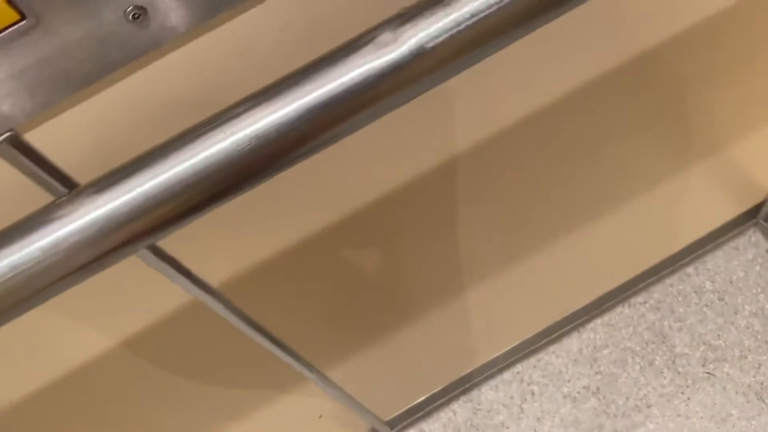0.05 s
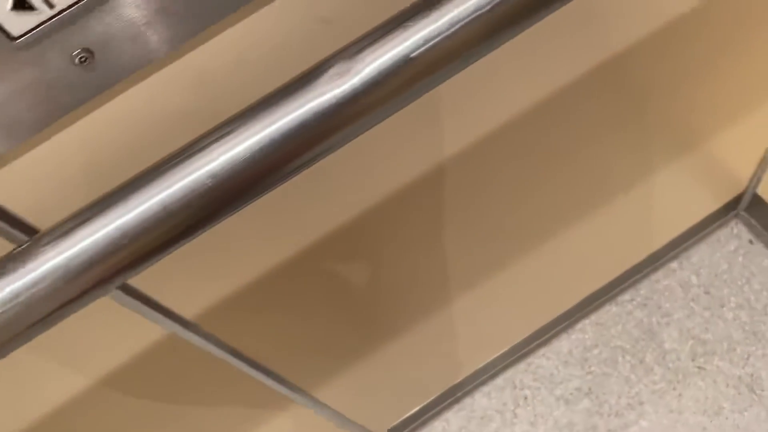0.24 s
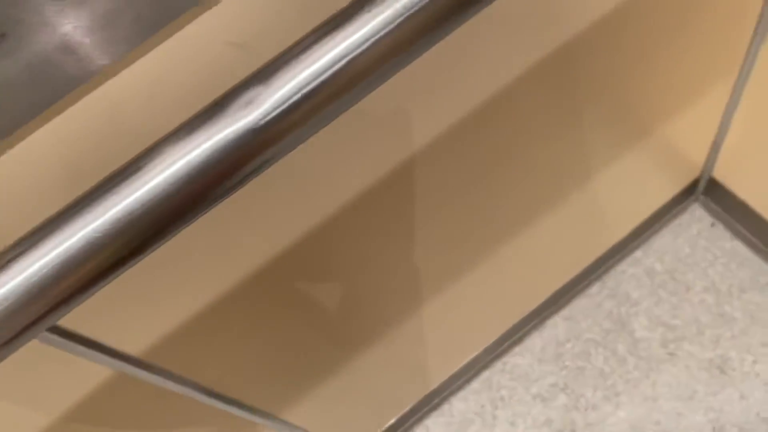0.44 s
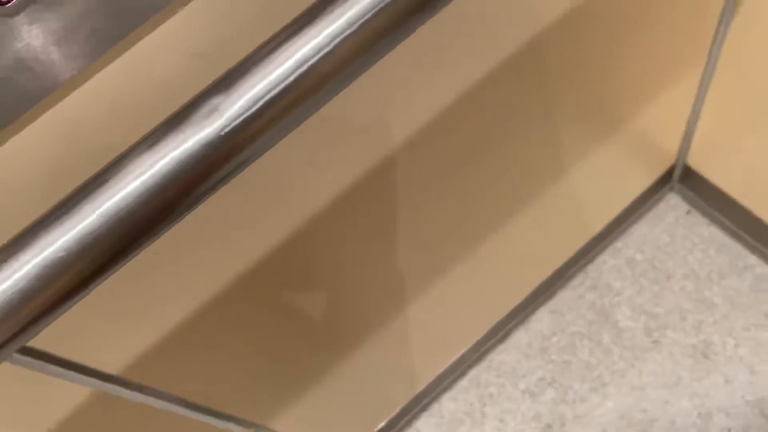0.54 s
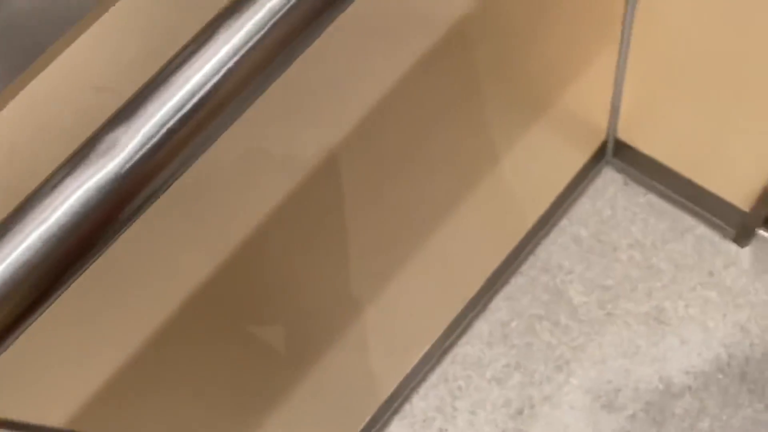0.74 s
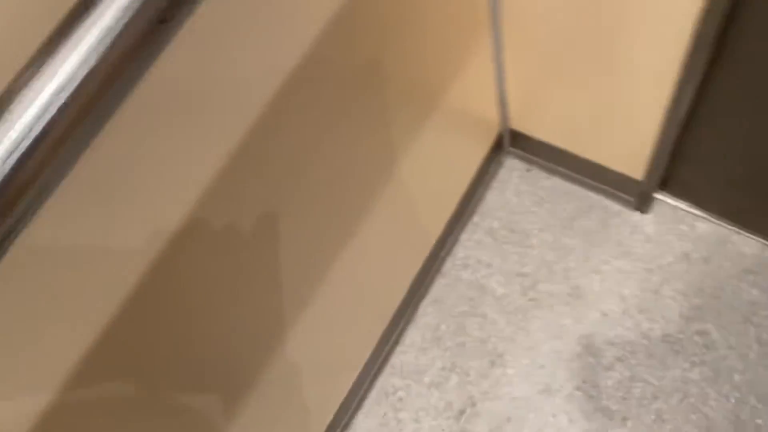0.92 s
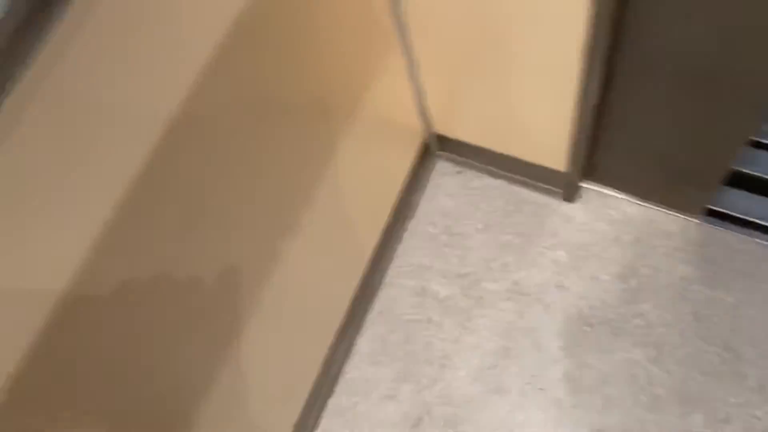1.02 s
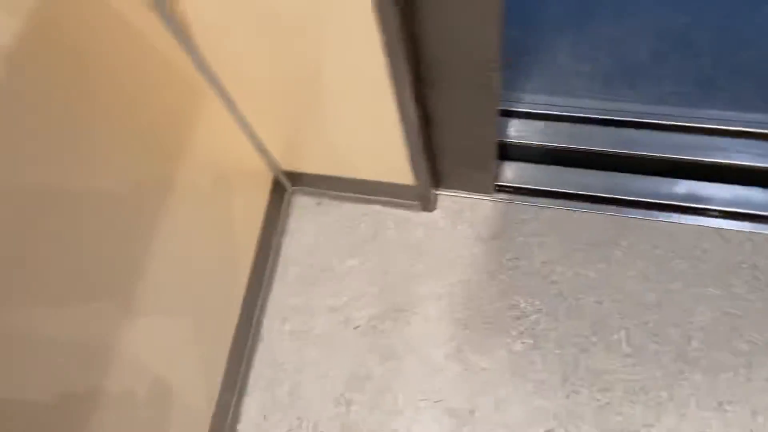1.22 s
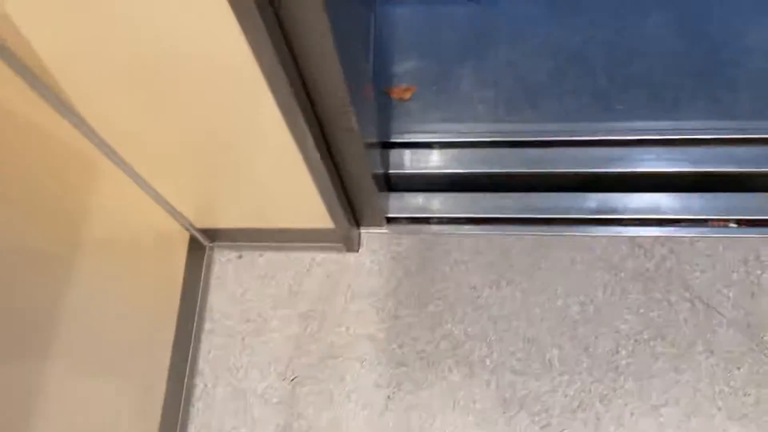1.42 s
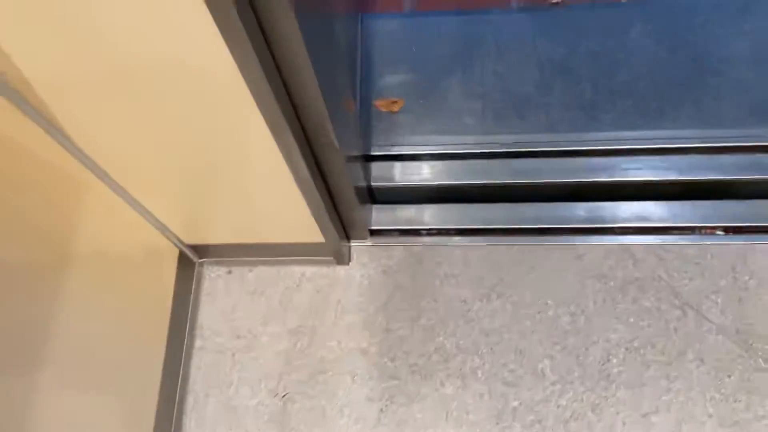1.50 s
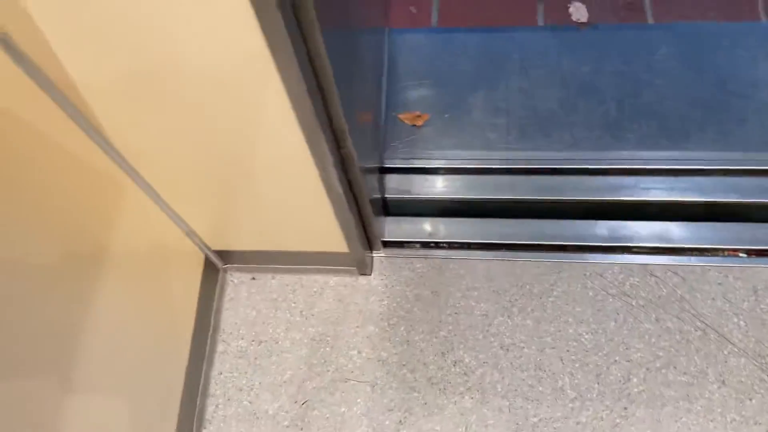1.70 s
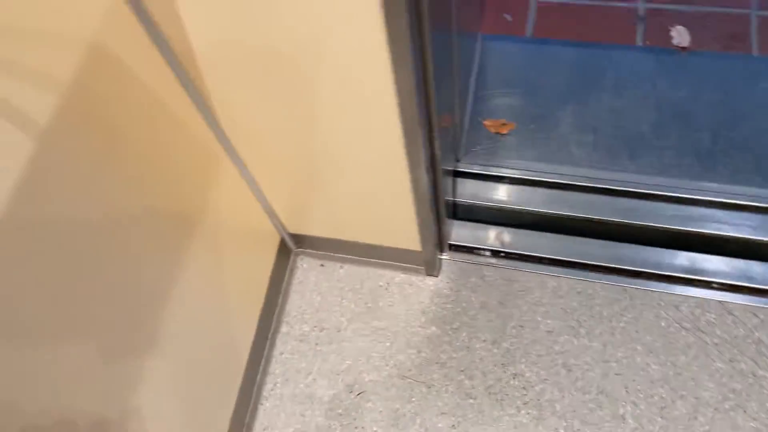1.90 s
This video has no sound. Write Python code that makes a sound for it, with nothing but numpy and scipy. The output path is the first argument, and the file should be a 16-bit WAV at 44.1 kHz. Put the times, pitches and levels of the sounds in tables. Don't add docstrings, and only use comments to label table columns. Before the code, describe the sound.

A sliding lift door rumbles open with a low hum, squeaky rollers and a closing metallic click

```python
import sys
import numpy as np
from scipy import signal
from scipy.fft import rfft, irfft, next_fast_len
from scipy.io import wavfile

SR = 44100
rng = np.random.default_rng(int(sys.argv[2]) if len(sys.argv) > 2 else 0)


def master_out(mix):
    frames = np.transpose(np.atleast_2d(mix))
    ceiling = np.clip(frames, -1, 1)
    pcm = np.round(ceiling * 32767).astype(np.int16)
    wavfile.write(sys.argv[1], SR, pcm)


def makeup_ratio(level_db):
    decades = np.asarray(level_db, float) / 20
    return 10 ** decades


N = 85995


def unit_rms(x):
    return x / np.sqrt(np.mean(x ** 2) + 1e-20)


def in_time(rows):
    s, *columns = np.transpose(rows)
    return [np.interp(np.arange(N) / SR, s, c) for c in columns]


def at_hz(points, hz):
    point_hz, point_db = np.array(points).T
    return np.interp(np.log(hz), np.log(point_hz), point_db)


def drift(rate_hz):
    r = np.exp(-80 * np.pi * rate_hz / SR)
    white = rng.standard_normal(N // 40 + 2002)
    slow = signal.lfilter([1], [1, -2 * r, r * r], white)[2000:]
    return np.interp(np.arange(N) / 40, np.arange(len(slow)), unit_rms(slow - slow.mean()))


def stereo(mid, side):
    return np.array([mid + side, mid - side])


def coloured(gain_at, count=2):
    size = next_fast_len(N)
    hz = np.maximum(np.fft.rfftfreq(size, 1 / SR), 1)
    white = rng.standard_normal((count, len(hz), 2)) @ [1, 1j]
    return irfft(white * gain_at(hz), size)[:, :N]


def swell(start_s, rise_s, hold_s, tau_s):
    t = np.arange(N) / SR - start_s
    fall = np.exp(-np.maximum(t - max(hold_s, rise_s), 0) / tau_s)
    return np.clip(t / rise_s, 0, 1) * fall


# (time [s], level [dB])
DOOR_SPEED = [(0.0, -57), (0.13, -49.5), (0.292, -45), (0.646, -40), (1.128, -40), (1.226, -40),
              (1.394, -46.5), (1.758, -58), (1.95, -61.5)]


def door_speed():
    return in_time(DOOR_SPEED)[0]


def panel_mode(rows, pan, flutter_db, wobble_hz):
    side_db = -11
    hz, db = in_time(rows)
    phase = 2 * np.pi * np.cumsum(hz + wobble_hz * drift(10.9)) / SR
    level = np.sqrt(2) * makeup_ratio(db + flutter_db * drift(20))
    side = makeup_ratio(side_db) * np.cos(phase) + pan * np.sin(phase)
    return stereo(level * np.sin(phase), level * side)


# (time [s], pitch [Hz], level [dB])
HUM_LOW = [(0, 109.3, -47), (.162, 106.2, -40.5), (.228, 112.8, -37), (.45, 113.3, -24.5),
           (.526, 113.9, -33.5), (.542, 112.5, -23.5), (.656, 113.8, -24.5), (.738, 113.9, -36.5),
           (.96, 113.4, -15), (1.058, 113.3, -20.5), (1.118, 108, -19.5), (1.146, 110.4, -32),
           (1.264, 117.3, -26.5), (1.324, 117.8, -19.5), (1.498, 117.9, -32.5), (1.618, 111.2, -43),
           (1.916, 118, -44), (1.95, 121.7, -67)]
# (time [s], pitch [Hz], level [dB])
HUM_HIGH = [(0.0, 155.9, -58), (0.048, 163.1, -56.5), (0.168, 164, -36.5), (0.362, 172.1, -41),
            (0.45, 161.2, -31.5), (0.498, 164, -46.5), (0.548, 162.9, -30), (0.722, 168.3, -37.5),
            (0.884, 168.9, -40.5), (0.96, 169.7, -26.5), (1.222, 173, -36.5), (1.298, 170.1, -26.5),
            (1.488, 174.4, -39), (1.59, 164.4, -38.5), (1.65, 175.7, -54.5), (1.71, 171.7, -40),
            (1.906, 168, -55), (1.95, 176.8, -53)]


def panel_hum():
    low = panel_mode(HUM_LOW, pan=0.36, flutter_db=1.5, wobble_hz=1.8)
    return low + panel_mode(HUM_HIGH, pan=.05, flutter_db=3.56, wobble_hz=5.06)


# (time [s], level [dB])
SWAY_LEVEL = [(0.0, -51), (0.238, -35.5), (0.684, -42), (1.026, -36), (1.07, -45.5), (1.292, -35),
              (1.738, -39.5), (1.95, -52)]
# (frequency [Hz], level [dB per Hz])
SWAY_COLOUR = [(20, -16), (34, 0), (45, -0.5), (58, -8), (75, -18.5)]


def sway():
    mid, side = unit_rms(coloured(lambda hz: makeup_ratio(at_hz(SWAY_COLOUR, hz)) * (hz < 90) * (hz > 12)))
    return makeup_ratio(in_time(SWAY_LEVEL)[0] + 3.0) * stereo(mid, makeup_ratio(-14) * side)


# (frequency [Hz], width [Hz], level [dB])
CAB_MODES = [(71.6, 3.9, -37.5), (99.7, 33, -31.5), (65, 9, -38.5), (144.4, 22, -35.5),
             (197.6, 15.4, -37.5), (252, 76, -39.5), (321, 17, -40.5), (365, 26, -41), (483.5, 32, -46),
             (561.6, 14, -47.5), (638, 38, -47)]


def cab(swing_db):
    follows_low, follows_per_octave, spread_hz = 0.8, 0.35, 260
    out = 0
    for hz, width_hz, db in CAB_MODES:
        mid, side = unit_rms(coloured(lambda f: 1 / (1 + (2 * (f - hz) / (1.57 * width_hz)) ** 2)))
        follows = follows_low + follows_per_octave * max(0, np.log2(hz / 170))
        out = out + makeup_ratio(db + follows * swing_db) * stereo(mid, side * min(1, hz / spread_hz))
    return out


# (frequency [Hz], level [dB per Hz])
RUSH_COLOUR = [(150, -2.5), (400, 0.5), (1100, -9), (2000, -19.5), (3000, -21.5), (5800, -29.5),
               (9800, -34.5), (15500, -46.5)]


def rush(speed_db):
    gain_db, patchy_db = 0.5, 1.5
    bright_follows = -0.075
    together = drift(5.7)
    swing_db = speed_db - speed_db.max()
    out, power = 0, 0
    for k in range(7):
        centre_hz = 200 * 2 ** k

        def band(hz):
            overlap = np.cos(np.clip(np.log2(hz / centre_hz), -1, 1) * np.pi / 2)
            return makeup_ratio(at_hz(RUSH_COLOUR, hz)) * overlap

        pair = coloured(band)
        power += pair.var()
        flicker_db = patchy_db * (0.36 * together * k / 4 + drift(23))
        extra_db = bright_follows * max(k - 2, 0) ** .5 * swing_db
        out = out + makeup_ratio(extra_db + flicker_db) * stereo(*pair)
    return makeup_ratio(speed_db + gain_db) * out / np.sqrt(power)


# (time [s], level [dB], rise [s], decay t60 [s], centre [Hz])
SCUFFS = [(0.062, -53.5, 0.011, 0.28, 1530), (0.158, -41, 0.0068, 0.34, 1040),
          (0.289, -55, 0.026, 0.36, 5850), (.455, -56, 0.0059, 0.27, 2550), (0.654, -56.5, 0.017, .2, 5030),
          (.78, -53, 0.02, 0.39, 4570), (1.118, -53.5, 0.0092, 0.24, 4420),
          (1.346, -48.5, 0.0025, 0.17, 1880), (1.364, -52.5, 0.0082, 0.14, 4440),
          (1.371, -50.5, 0.0071, 0.11, 1500), (1.27, -45, 0.034, .3, 400),
          (1.497, -58.5, 0.0038, 0.39, 3030), (1.553, -59, 0.0077, 0.084, 3360)]


def scuffs():
    out = 0
    for s, db, rise_s, t60_s, hz in SCUFFS:
        octaves = 0.72 * (hz / 2500) ** 0.1
        pair = unit_rms(coloured(lambda f: np.exp(-.5 * (np.log2(f / hz) / octaves) ** 2)))
        out = out + makeup_ratio(db) * swell(s, rise_s, rise_s, t60_s / np.log(1000)) * stereo(*pair)
    return out


# (time [s], peak [dB])
KNOCK_BLOWS = [
    (.066, -54),
    (.072, -49),
    (0.1623, -46.5),
    (0.1656, -37),
    (.170, -36.5),
    (.176, -42),
    (.181, -40.5),
    (.195, -42),
    (.204, -46.5),
]
# (frequency [Hz], level [dB], decay t60 [s])
KNOCK_MODES = [(830, -7, .06), (1017, -5, .08), (1260, 0, .05), (1405, -4, .06), (1669, -5, .06),
               (1906, -8, .05), (2300, -16, .05), (2700, -18, .05), (3100, -18, .04)]


def knock():
    out = np.zeros((2, N))
    s, db = np.transpose(KNOCK_BLOWS)
    for hz, mode_db, t60_s in KNOCK_MODES:
        clicks = np.full((2, N), 1e-18)
        clicks[:, (s * SR).astype(int)] = makeup_ratio(db + mode_db + rng.normal(0, 2.75, (2, len(s))))
        r, w = makeup_ratio(-60 / (t60_s * SR)), 2 * np.pi * hz / SR
        out += signal.lfilter([0, np.sin(w)], [1, -2 * r * np.cos(w), r * r], clicks)
    return out


def stick_slip(rows, wander_hz):
    flutter_db, rise_s, tail_s = 3.2, .004, .006
    out = np.zeros((2, N))
    wander, flutter = drift(500) + .1 * drift(15), drift(130)
    turns = rng.uniform(.6, 1.3, len(rows))
    for (s, length_s, hz, db, over_db), turn in zip(rows, turns):
        start = int(s * SR)
        body = slice(start, int((s + length_s) * SR))
        span = slice(start, int((s + length_s + .1) * SR))
        pitch_hz = hz + wander_hz * (wander[span] - wander[body].mean())
        port_phase = 1.6 * np.array([[.5], [-.5]]) * turn
        phase = 2 * np.pi * np.cumsum(pitch_hz) / SR + port_phase
        tone = np.sin(phase)
        tone = tone + makeup_ratio(over_db) * np.sin(2 * phase) * (hz < 7000)
        tone = tone + makeup_ratio(over_db - 10) * np.sin(3 * phase) * (hz < 4500)
        level = makeup_ratio(db + 1.5 + flutter_db * (flutter - flutter[body].mean()))
        level = level * swell(s, rise_s, length_s, tail_s)
        out[:, span] += level[span] * tone
    return out


# (time [s], length [s], pitch [Hz], level [dB], overtone [dB])
STEADY_SQUEAKS = [(.198, 0.022, 3670, -60, -19.5), (.24, 0.026, 3810, -55.5, -4),
                  (.275, 0.012, 3840, -55, 6), (.261, 0.037, 2700, -49.5, -12),
                  (.342, 0.024, 3180, -53.5, -12), (.302, 0.035, 5700, -54, -16),
                  (.695, 0.03, 5700, -59.5, -11), (.722, 0.05, 5730, -58, -16),
                  (.772, .048, 5870, -54.5, -15), (.775, 0.031, 3870, -55, -4.5),
                  (.865, .025, 5798, -59, -15), (.885, 0.036, 6050, -56.5, -18),
                  (.925, .035, 6130, -61, -20), (.892, 0.043, 3980, -56, -16),
                  (1.008, 0.015, 3530, -57, -13), (1.066, 0.0095, 3214, -49, -12.5),
                  (1.076, 0.019, 3330, -51.5, -19), (1.1, 0.019, 2620, -49, -10.5),
                  (1.145, 0.0093, 2975, -43, -22), (1.148, 0.022, 3330, -49, -14),
                  (1.243, 0.011, 3930, -56, -11)]
# (time [s], length [s], pitch [Hz], level [dB], overtone [dB])
ROUGH_SQUEAKS = [(.485, 0.058, 7930, -58, -20), (.335, .022, 5870, -58, -20), (.07, 0.062, 2380, -65, 0),
                 (.305, 0.056, 2890, -51, -4.5), (.665, 0.018, 3870, -58, 0), (.70, 0.06, 2880, -60.5, 4),
                 (.755, 0.026, 2400, -49, -10), (.777, 0.043, 2430, -45, -17.5),
                 (1.12, 0.041, 2750, -55, -3.5), (1.135, 0.013, 3100, -49.5, -3),
                 (1.172, 0.028, 3167, -53.5, -10.5)]


def roller_squeaks():
    return stick_slip(STEADY_SQUEAKS, wander_hz=70) + stick_slip(ROUGH_SQUEAKS, wander_hz=150)


def click_colour(lowest_hz):
    return lambda f: np.clip(f / lowest_hz, 0, 1) ** 2 / (1 + (f / 11000) ** 4)


# (time [s], peak [dB], lowest [Hz])
TICKS = [
    (1.342, -52, 1500),
    (1.571, -62.5, 7000),
    (1.683, -56.5, 5000),
    (1.6885, -54, 3000),
    (1.692, -54.5, 1500),
    (1.706, -61, 5000),
    (1.718, -62, 4500),
]


def ticks():
    out = 0
    for s, db, lowest_hz in TICKS:
        pair = unit_rms(coloured(click_colour(lowest_hz)))
        out = out + makeup_ratio(db) * swell(s, .0005, 0.00081, .003) * stereo(*pair)
    return out


# (frequency [Hz], level [dB], decay t60 [s])
LATCH_MODES = [(1720, 1, 0.13), (2700, 6.5, 0.26), (13800, 5.5, .05), (5700, 6.5, 0.22), (9500, 5, 0.25),
               (10530, 5, 0.27), (15600, 0.5, .035)]


def latch():
    latch_s, crack_db, crack_t60_s = 1.6875, -59.5, 0.27
    ring_db, width_hz = -65.5, 300
    touch_s, touch_db = latch_s - .0055, -5
    crack = unit_rms(coloured(click_colour(2500)))
    out = makeup_ratio(crack_db) * swell(latch_s, 0.0018, 0.006, crack_t60_s / np.log(1000)) * stereo(*crack)
    for hz, db, t60_s in LATCH_MODES:
        pair = unit_rms(coloured(lambda f: 1 / (1 + ((f - hz) / width_hz) ** 2)))
        tau_s = t60_s / np.log(1000)
        hits = makeup_ratio(touch_db) * swell(touch_s, .001, .003, tau_s) + swell(latch_s, .001, .003, tau_s)
        out = out + makeup_ratio(ring_db + db - 4.5) * hits * stereo(*pair)
    return out


def scene():
    speed_db = door_speed()
    hiss = makeup_ratio(-92.5) * rng.standard_normal((2, N))
    rolling = panel_hum() + sway() + cab(speed_db - speed_db.max()) + roller_squeaks()
    groove = rush(speed_db) + scuffs()
    return rolling + groove + knock() + ticks() + latch() + hiss


def low_pass(x):
    return signal.sosfilt(signal.butter(12, 15780, fs=SR, output="sos"), x)


# (frequency [Hz], left minus right [dB])
LEAN = [(200, -1), (630, -1), (2050, -1), (3690, 2), (6650, 3), (12000, -2.5)]
# (frequency [Hz], gain [dB])
MID_COLOUR = [(6400, 0), (6850, -23), (8150, -24), (8600, -2), (11500, 0), (12300, -6), (12600, -22),
              (16000, -12)]
# (frequency [Hz], gain [dB])
SIDE_COLOUR = [(100, -8.5), (400, -1), (2500, -2.5), (8500, -1.5), (9500, 1.5), (10200, -23),
               (12900, -20.5), (13500, 1)]
# (time [s], length [s], leak [dB])
MID_OPENINGS = [(0.234, 0.042, -12), (.375, .03, -11.5), (0.478, 0.09, -11.5), (0.808, 0.042, -22.5),
                (0.94, 0.035, -16.5), (1.062, 0.024, -13.5), (1.183, 0.035, -12), (1.341, 0.019, -6.5),
                (1.374, 0.026, -7.5), (1.497, 0.019, -8.5), (1.682, 0.018, -12)]


def record(dry):
    edge_s = .003
    size = next_fast_len(N + 4096)
    hz = np.maximum(np.fft.rfftfreq(size, 1 / SR), 1)
    from_edge_s = np.minimum(np.arange(N), N - np.arange(N)) / SR
    fade = np.sin(np.pi / 2 * np.clip(from_edge_s / edge_s, 0, 1)) ** 2
    balance_db = at_hz(LEAN, hz) * np.array([[.5], [-.5]])
    left, right = rfft(dry * fade, size) * makeup_ratio(balance_db)
    total, difference = left + right, left - right
    spectra = [total * makeup_ratio(at_hz(MID_COLOUR, hz)),
               total * (hz > 6400) * (hz < 16000),
               difference * makeup_ratio(at_hz(SIDE_COLOUR, hz))]
    mid, open_mid, side = irfft(spectra, size)[:, :N] / 2
    leak = sum(makeup_ratio(db) * swell(s, 0.0048, length_s, .004) for s, length_s, db in MID_OPENINGS)
    return low_pass(stereo(mid + leak * open_mid, side))


dry = scene()
out = record(dry)
master_out(out)
```